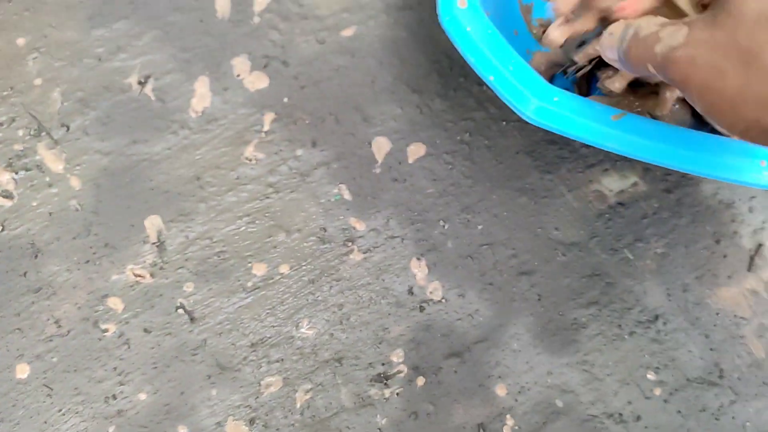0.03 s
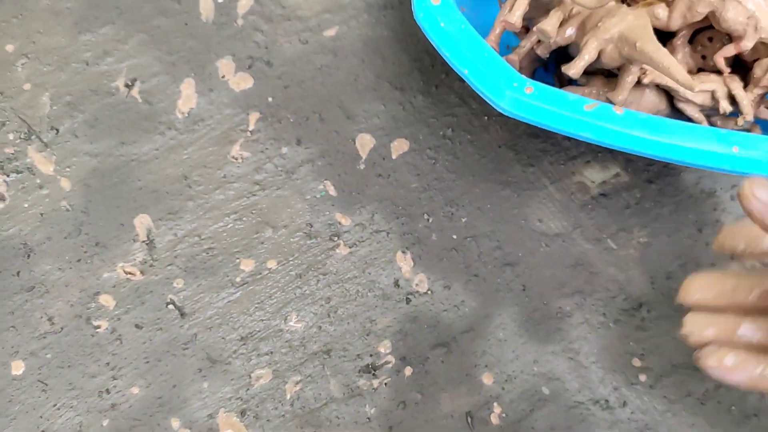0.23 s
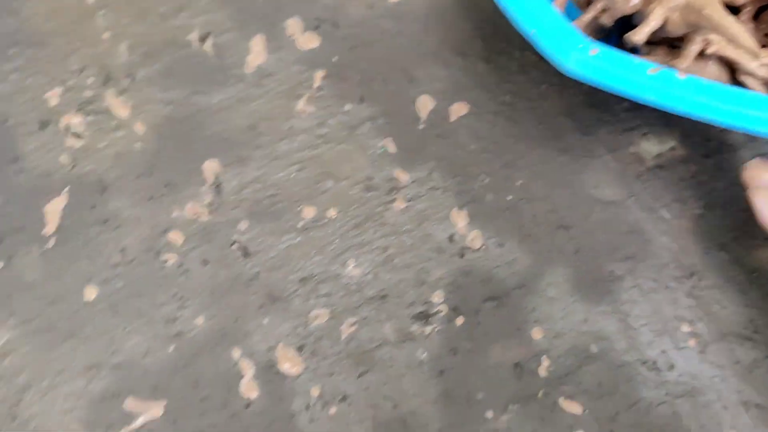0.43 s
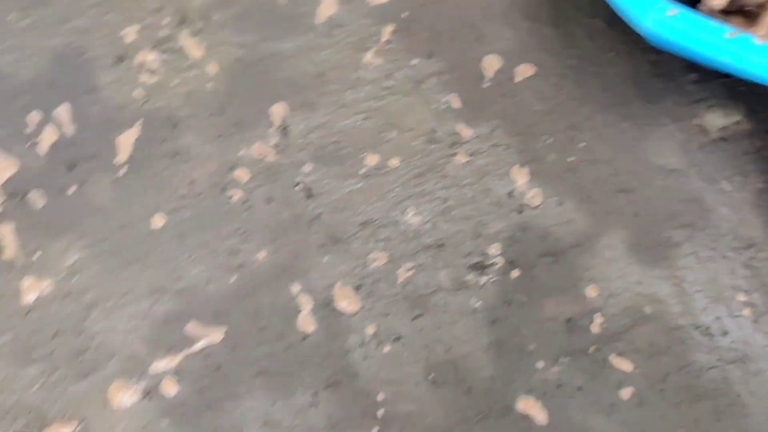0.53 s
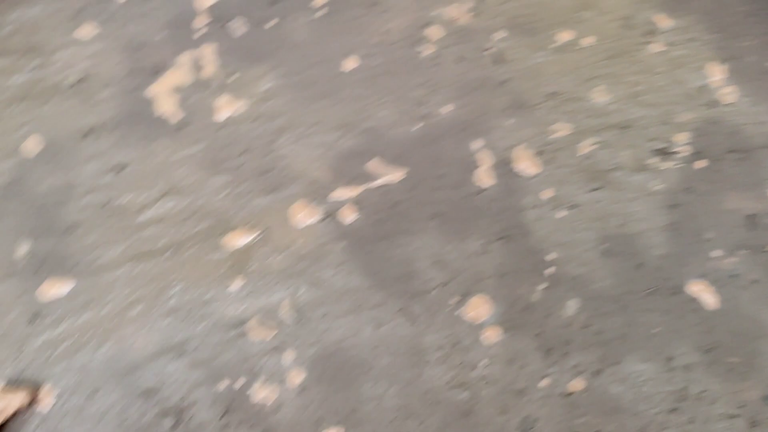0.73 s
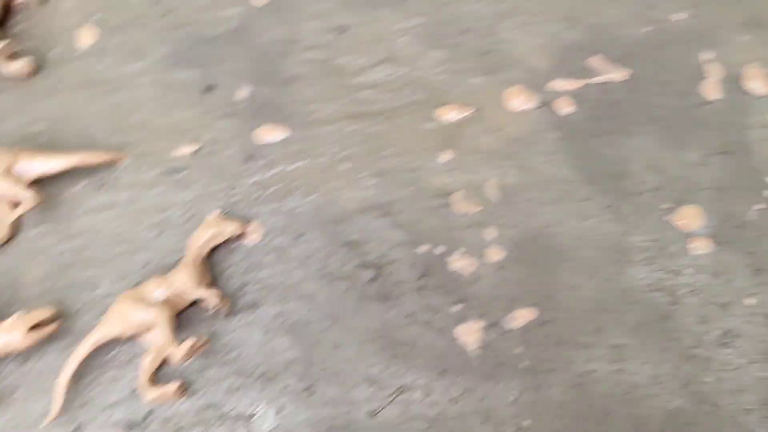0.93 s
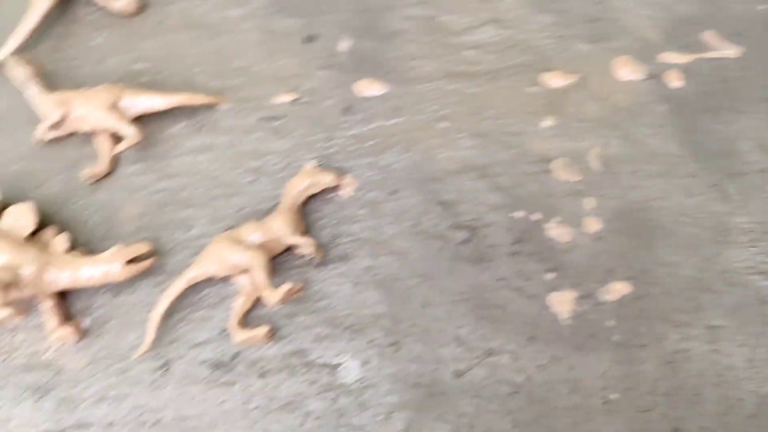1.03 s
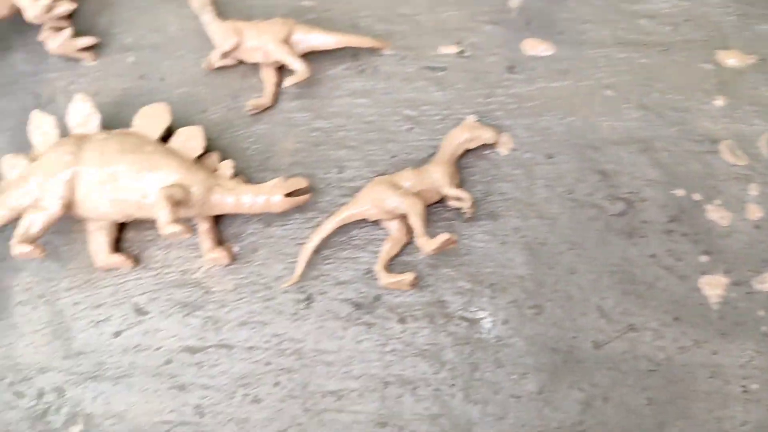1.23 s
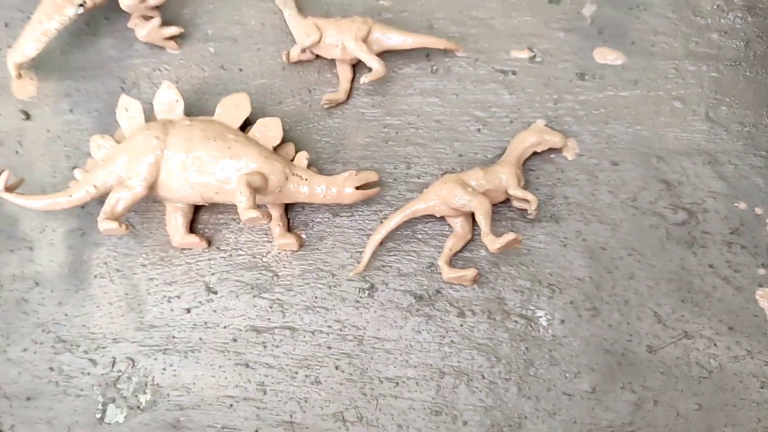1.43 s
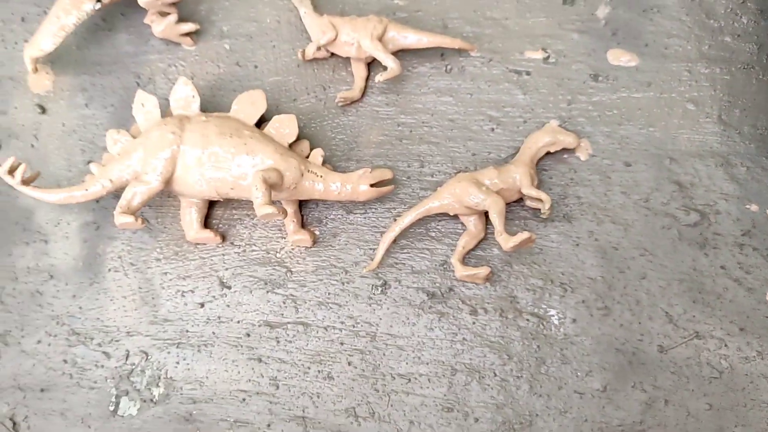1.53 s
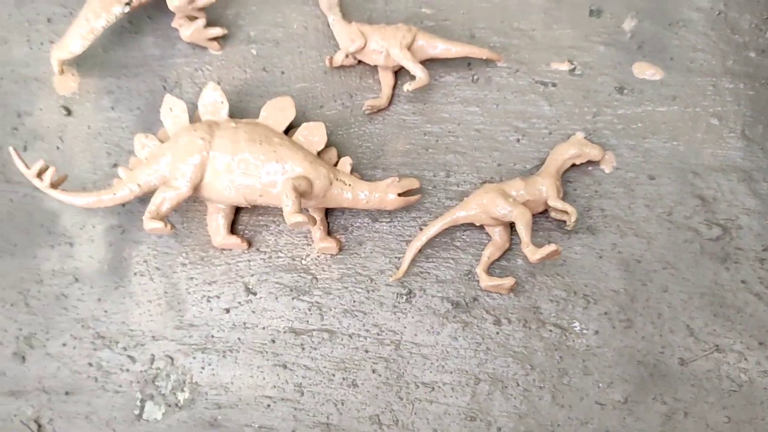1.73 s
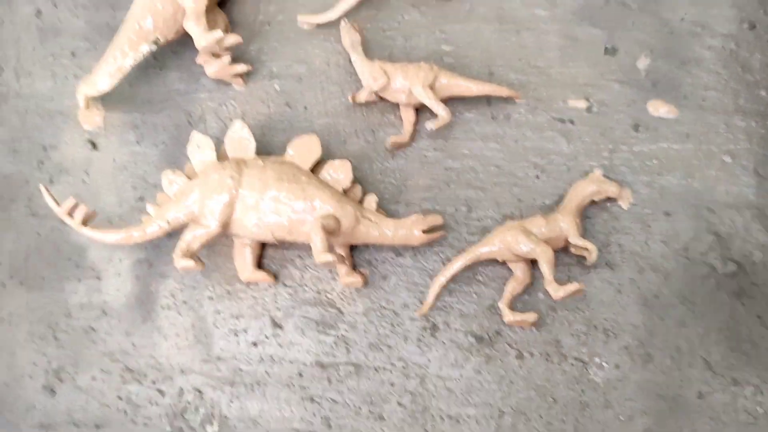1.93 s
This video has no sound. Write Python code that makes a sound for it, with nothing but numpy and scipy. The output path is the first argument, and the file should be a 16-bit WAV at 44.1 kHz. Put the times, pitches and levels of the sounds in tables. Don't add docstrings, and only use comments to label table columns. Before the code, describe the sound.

Hollow plastic toys clatter sharply in a plastic tub, close to the microphone, then sandals scrape over gritty concrete and a heel thuds; a distant engine hums low outdoors, with faint, very high bird twitter.

```python
import sys
import numpy as np
from scipy import signal
from scipy.fft import rfft, irfft, next_fast_len
from scipy.io import wavfile
from scipy.ndimage import uniform_filter1d, map_coordinates

SR = 44100
rng = np.random.default_rng(int(sys.argv[2]) if len(sys.argv) > 2 else 0)


def pcm_store(signal):
    levels = np.round(np.clip(np.atleast_2d(signal), -1, 1) * 32767)
    wavfile.write(sys.argv[1], SR, levels.astype(np.int16).T)


def gain_from_decibels(decibels):
    exponent = np.asarray(decibels, float) / 20
    return 10 ** exponent


N = 88200

# [t/s, lower tone level/dB, upper tone level/dB]
ENGINE_TONES = [(0, -44.5, -49), (.6, -44.5, -48), (.85, -52, -43), (1.05, -44.5, -49.5), (1.25, -43, -43),
                (2, -42.5, -42)]
# [multiple of the firing rate, level/dB]
FIRING_TONES = [(5, -52), (8, -53), (9, -51)]
# [f/Hz, level per Hz/dB]
RUMBLE_COLOUR = [(15, -81), (25, -29), (54, -21), (82, -8), (114, -7), (192, -8.5), (284, -8.5), (330, -13),
                 (460, -17.5), (900, -41), (1170, -94), (1980, -120)]
FIRING_HZ, LOWER_HZ, UPPER_HZ, RUMBLE_DB = 28.01, 111.8, 279.6, -45

# [f/Hz, level per Hz/dB]
AIR_COLOUR = [(290, -9.5), (500, -12), (900, -18), (2200, -25.5), (3500, -27), (7300, -33.5), (8600, -26.5),
              (11000, -30), (15900, -35.5)]
AIR_DB = -55.5
# [f/Hz, likeness 0..1]
ALIKE = [(60, 1), (250, 0.64), (700, 0.28), (2000, 0.16), (8000, 0.054)]

# [t/s, f/Hz, level/dB]
TWITTER = [
    [(.025, 11500, -61), (.035, 11800, -66), (.055, 11400, -67.5), (.068, 11500, -71), (.088, 11000, -65)],
    [(.092, 12000, -74), (.1, 11900, -64), (.11, 11300, -67), (.15, 10600, -85)],
    [(.415, 11000, -93), (.435, 10200, -73), (.445, 10150, -81), (.47, 10350, -76), (.49, 10900, -71),
     (.515, 11250, -73)],
    [(.518, 11400, -76), (.535, 11500, -74), (.555, 11000, -80)],
    [(1.89, 11000, -82), (1.93, 12400, -72)],
    [(1.935, 12700, -80), (1.99, 13700, -79)],
]
# [t/s, level/dB]
FLOCK = [
    (1.66, -68),
    (1.72, -61),
    (1.8, -56),
    (1.87, -68),
    (1.93, -63),
    (2, -57),
]
FLOCK_HZ = (10500, 11200, 11900, 13100, 14000)

# [t/s, level/dB]
RATTLE = [(.095, -38), (.1, -38), (.122, -32.5), (.16, -37), (.186, -52), (.195, -31), (.214, -33.5),
          (.222, -27), (.24, -29), (.27, -32), (.295, -38.5), (.31, -46.5), (.33, -38.5), (.35, -50),
          (.38, -67)]
# [t/s, peak level/dB, pitch factor, crack level/dB, left-right/dB]
CLACKS = [
    (.098, -27.5, 1.04, -8, -0.5),
    (.117, -18.5, 0.68, -19, -2),
    (.124, -25.5, 0.89, -9, 4.5),
    (.146, -22.5, 0.6, -25, -1),
    (.229, -19, 1.28, -25, 6),
    (.237, -30, 1.05, -31, 9),
    (.2555, -23, 1.1, -16, 5),
    (.2745, -18.5, 0.496, -1.5, 1),
    (.317, -22.5, 0.55, -30, -2),
    (.327, -27.5, 1.14, -19, 2),
]
# [f/Hz, level/dB, time to fall 60 dB/s]
TOY = [(243, -11, 0.1), (370, -10, 0.046), (490, -14, 0.03), (718, -1.5, 0.04), (987, -2.5, 0.015),
       (1178, -3, 0.021), (1437, -10.5, 0.027), (2070, -13.5, 0.014), (5080, -15, 0.0037)]
# [t/s, peak level/dB, pitch factor, crack level/dB, left-right/dB]
SNAP = [
    (.1905, -11.5, 1.0, -7, 1.5),
]
# [f/Hz, level/dB, time to fall 60 dB/s]
SMALL_TOY = [(650, -3, 0.02), (990, -1, 0.018), (1423, 1, 0.015), (1810, -3, 0.012), (2570, -11, 0.01),
             (3400, -13, 0.007), (4330, -9, 0.007)]
# [t/s, peak level/dB, pitch factor, crack level/dB, left-right/dB]
DROP = [
    (.2181, -6.5, 0.99, -10.5, 2),
]
# [f/Hz, level/dB, time to fall 60 dB/s]
BIG_TOY = [(250, -13, 0.073), (366, -12, 0.052), (742, -2.5, 0.041), (984, -3, 0.017), (1053, -7, 0.027),
           (1226, -2.5, .025), (1401, -4.5, 0.022), (1780, -9.5, 0.017), (3610, -7, 0.01),
           (4970, -8.5, 0.0093)]

# [t/s, peak level/dB, pitch factor, crack level/dB, left-right/dB]
TICKS = [
    (1.2925, -46, 0.88, 12.5, 0.5),
    (1.474, -38, 1.1, 1, 1),
    (.684, -57, 0.64, -7, 0),
    (.738, -61, 0.77, 13, -1),
    (1.0603, -55, 0.71, 16, -5),
    (1.0698, -46.5, 0.91, 16, -3),
    (1.5078, -61, 0.88, 9, 1.5),
]
# [f/Hz, level/dB, time to fall 60 dB/s]
PEBBLE = [(1480, 0, 0.01), (3520, -8, 0.0055)]
# [t/s, level/dB, body level/dB]
SHUFFLE = [(.72, -67.5, 5), (.76, -59.5, -19), (.85, -53.5, -7), (.89, -48, -7.5), (.98, -45.5, -6.5),
           (1.02, -50.5, -8.5), (1.07, -43, -9.5), (1.14, -47.5, 0), (1.19, -55.5, -5.5), (1.23, -69, -24),
           (1.36, -58.5, -19), (1.468, -65.5, 2), (1.478, -53, 0.5), (1.535, -40, -3.5), (1.63, -39, 0),
           (1.68, -56.5, 3), (1.76, -54.5, 3.5), (1.85, -64, -17), (2, -63, -5)]
# [f/Hz, level per Hz/dB]
GRIT_COLOUR = [(1180, 0), (2000, -6), (3420, 1.5), (3900, 2.5), (4520, 2), (7090, -5.5), (8740, 3.5),
               (11400, 5), (13200, -3), (15900, -9.5)]
# [f/Hz, width/Hz, level/dB]
SOLE = [(630, 180, -16), (1228, 140, 0.5), (1500, 37, 2.5), (1470, 3070, -3)]
GRIT_DB, SOLE_DB, GRITTY_DB = 0.32, 3, 2
# [t/s, level/dB, f/Hz]
SQUEAK = [
    (.83, -65, 587),
    (.87, -55, 598),
    (.92, -46, 587),
    (.96, -68, 585),
]

# [t/s, peak level/dB, pitch factor, crack level/dB, left-right/dB]
THUDS = [
    (1.6206, -10, 1.007, -19, 4.5),
    (1.6285, -21.5, 1.77, -14, 3),
    (1.655, -25.5, 1.26, -30, 0),
    (1.682, -26.5, 0.93, -12, 0),
    (1.756, -32, 1.3, -7, 4),
    (1.821, -32.5, 1.0, -30, -2),
]
# [f/Hz, level/dB, time to fall 60 dB/s]
HEEL = [(215, -1, .06), (300, -18, .03), (395, 0, .055), (560, -16, .04), (738, -11, .05), (950, -19, .05)]
# [t/s, level/dB]
SCUFFLE = [(1.63, -46), (1.645, -35.5), (1.67, -45), (1.688, -37.5), (1.72, -51), (1.748, -53),
           (1.758, -38), (1.775, -44), (1.785, -53), (1.8, -48.5), (1.84, -86)]
# [f/Hz, time to fall 60 dB/s]
YARD = [(300, 0.28), (2000, 0.28), (12000, 0.21)]
YARD_DB = -14
# [f/Hz, left-right/dB]
LEAN = [(300, 0.3), (1200, 0), (4000, 0.6), (8000, -6.7), (13000, 8.5)]


def unit(x):
    return x / np.sqrt(np.mean(x ** 2) + 1e-20)


def along(points, hz):
    f, v = np.transpose(points)
    return np.interp(np.log(hz + 1), np.log(f + 1), v)


def curves(rows):
    s, *cols = np.transpose(rows)
    t = np.arange(N) / SR
    gate = np.clip(np.minimum(t - s[0], s[-1] + .01 - t) / .01, 0, 1)
    return [np.interp(t, s, c) for c in cols] + [gate]


def wobble(rate):
    return map_coordinates(rng.standard_normal(int(N * rate / SR) + 4), [np.arange(N) * rate / SR])


def whistle(hz):
    return np.sin(2 * np.pi * np.cumsum(hz) / SR)


def filtered(x, response):
    m = next_fast_len(N + SR // 2)
    return irfft(rfft(x, m) * response(np.fft.rfftfreq(m, 1 / SR)), m)[..., :N]


def panned(x, db):
    return x * gain_from_decibels([[db / 2], [-db / 2]])


def lagged(x, lag_s):
    return filtered(x, lambda hz: np.exp(-1j * np.pi * hz * lag_s * np.array([[1], [-1]])))


def rush(gain, patchy_db=3.5):
    z = signal.stft(rng.standard_normal((2, N)), nperseg=512)[2]
    field = uniform_filter1d(rng.standard_normal(z.shape[1:]), size=3, axis=0)
    field = uniform_filter1d(field, size=9, axis=1)
    pair = signal.istft(z * gain_from_decibels(patchy_db * unit(field)), nperseg=512)[1][:, :N]

    def mid_side(hz):
        angle = np.arccos(np.clip(along(ALIKE, hz), -1, 1)) / 2
        return gain(hz) * np.array([np.cos(angle), np.sin(angle)])

    mid, side = filtered(pair, mid_side)
    return unit(np.array([mid + side, mid - side]))


def struck(hits, modes, attack_s, crack_s, scatter_db, crack_hz):
    out, t = np.zeros((2, N + SR)), np.arange(SR // 5) / SR
    f, level, t60 = np.transpose(modes)[..., None]
    soft = np.exp(-2 * np.pi * crack_hz / SR)
    for s, db, pitch, crack_db, pan in hits:
        level_draw, pitch_draw, *side_draws = rng.standard_normal((4, len(modes), 1))
        hz = f * pitch * (1 + scatter_db / 200 * pitch_draw)
        fall_db = 60 * t / t60 * max(pitch, 1) ** 1.5
        ring = []
        for side in side_draws:
            mode_db = level + scatter_db * (level_draw + 1.54 * side) - fall_db
            phase = 0.43 * side * np.minimum(f / 700, 2)
            ring.append(np.sum(gain_from_decibels(mode_db) * np.sin(2 * np.pi * hz * t + phase), 0))
        ring = np.array(ring) * (1 - np.exp(-t / attack_s))
        noise = signal.lfilter([(1 - soft) ** 2], [1, -2 * soft, soft ** 2], rng.standard_normal((2, len(t))))
        crack = gain_from_decibels(crack_db + 3.5 - 60 * t / crack_s) * np.minimum(t / 0.0022, 1) * noise
        hit = gain_from_decibels(db) * panned(ring / np.abs(ring).max() + crack, pan)
        out[:, round(s * SR):][:, :len(t)] += hit
    return out[:, :N]


def grains(rows, hz, spread, life, count):
    u, g, k = rng.random(count), rng.standard_normal((count, 2)), np.arange(2400)
    start = ((rows[0][0] + u * (rows[-1][0] - rows[0][0])) * SR).astype(int)
    cycles = hz * np.exp(spread * np.clip(g[:, :1], -2, 1.6)) * k / SR
    tones = np.sin(2 * np.pi * cycles) * np.exp(-cycles / life) * np.minimum(cycles, 1)
    at = (start[:, None] + k).ravel()
    pair = []
    for side in (1, -1):
        placed = tones * gain_from_decibels(side * 4.3 * g[:, 1:])
        pair.append(np.bincount(at, placed.ravel(), N)[:N])
    pair = np.array(pair)
    power = uniform_filter1d(pair ** 2, size=1500).mean(0)
    return pair / np.sqrt(np.abs(power) + 1e-3)


def engine():
    lower_db, upper_db, _ = curves(ENGINE_TONES)
    t = np.arange(N) / SR
    firing = 2 * np.pi * np.cumsum(FIRING_HZ * (1 + 0.011 * wobble(5.01))) / SR

    def tone(phase, db, loose):
        drift = loose * wobble(15) + np.array([[.1], [-.1]]) * wobble(5.87)
        return np.sqrt(2) * gain_from_decibels(db + 4.8 * loose * wobble(13.95)) * np.sin(phase + drift)

    weak = gain_from_decibels(-2.5) * sum(tone(k * firing, db, 0.92) for k, db in FIRING_TONES)
    lower = tone(2 * np.pi * LOWER_HZ * t, lower_db, 0.36)
    upper = panned(tone(2 * np.pi * UPPER_HZ * t, upper_db, 0.27), 0.5)
    swell = unit(gain_from_decibels(3.0 * wobble(8.88)))
    rumble = swell * rush(lambda hz: gain_from_decibels(along(RUMBLE_COLOUR, hz)), patchy_db=1.0)
    return weak + lower + upper + gain_from_decibels(RUMBLE_DB) * rumble


def outdoor_air():
    return gain_from_decibels(AIR_DB + 0.5 * wobble(7.9)) * rush(lambda hz: gain_from_decibels(along(AIR_COLOUR, hz)))


def bird():
    out = 0
    for call in TWITTER:
        hz, db, gate = curves(call)
        loudness = np.sqrt(2) * gate * gain_from_decibels(db - 0.5 + 4.0 * wobble(120))
        out = out + loudness * whistle(hz + 60 * wobble(150))
    db, gate = curves(FLOCK)
    for hz in FLOCK_HZ:
        loudness = gate * gain_from_decibels(db - 17 + 7.0 * wobble(60) + 4.0 * wobble(500))
        out = out + loudness * whistle(hz + 180 * wobble(22) + 200 * wobble(600))
    return panned(out, 17.0)


def rattle():
    level_db, gate = curves(RATTLE)
    contacts = grains(RATTLE, 960, 0.533, 0.99, count=900)
    tub = gain_from_decibels(-2.5) * grains(RATTLE, 257.6, 0.337, 3.5, count=150)

    def dust_colour(hz):
        return gain_from_decibels(along(GRIT_COLOUR, hz)) * (hz > 1000) * (3000 / (hz + 3000)) ** 2

    dust = gain_from_decibels(-12.5 + 2.8 * wobble(89)) * rush(dust_colour)
    fizz = rush(lambda hz: np.exp(-(np.log((hz + 1) / 11000) / 0.15) ** 2))
    fizz = gain_from_decibels(-65 + 0.096 * (level_db + 41)) * fizz
    return gate * (gain_from_decibels(level_db - 2.5) * (contacts + tub + dust) + panned(fizz, 15))


def toys():
    clacks = struck(CLACKS, TOY, 0.00067, 0.014, 2.95, crack_hz=8100)
    snap = struck(SNAP, SMALL_TOY, 0.0003, 0.01, 0.56, crack_hz=7440)
    drop = struck(DROP, BIG_TOY, 0.00063, 0.015, 0.64, crack_hz=6960)
    return rattle() + clacks + snap + drop


def grit_ticks():
    return struck(TICKS, PEBBLE, 0.00058, 0.013, 2.1, crack_hz=13000)


def shuffle():
    level_db, body_db, gate = curves(SHUFFLE)

    def grit_colour(hz):
        return gain_from_decibels(along(GRIT_COLOUR, hz)) * hz ** 2 / (hz ** 2 + 1500 ** 2)

    def sole_colour(f):
        return sum(gain_from_decibels(db) * np.abs(f * w / (c * c - f * f + 1j * f * w)) ** 2 for c, w, db in SOLE)

    grit = gain_from_decibels(GRIT_DB + GRITTY_DB * wobble(300) + 1.5 * wobble(35.3)) * rush(grit_colour)
    body = gain_from_decibels(SOLE_DB + body_db + GRITTY_DB * wobble(70)) * rush(sole_colour)
    return panned(gain_from_decibels(level_db) * gate * (grit + body), -1)


def strap_squeak():
    db, hz, gate = curves(SQUEAK)
    return gate * gain_from_decibels(db + 3.0 * wobble(40)) * whistle(hz + 15 * wobble(50))


def heel_thud():
    return struck(THUDS, HEEL, 0.004, 0.024, 1.0, crack_hz=1700)


def scuffle():
    level_db, gate = curves(SCUFFLE)
    scrapes = grains(SCUFFLE, 898, 0.351, 2.3, count=300)
    return panned(gate * gain_from_decibels(level_db) * scrapes, 6.2)


def yard(x):
    hz, t, z = signal.stft(rng.standard_normal((2, SR // 2)), SR, nperseg=256)
    tail = signal.istft(z * gain_from_decibels(-60 * t / along(YARD, hz)[:, None]), SR, nperseg=256)[1]
    later = np.pad(x, ((0, 0), (150, 0)))
    return signal.fftconvolve(later, tail / np.linalg.norm(tail[0]), axes=1)[:, :N]


def scene():
    far = engine() + outdoor_air() + bird()
    tub = lagged(toys(), 0.000093)
    feet = lagged(strap_squeak() + heel_thud() + scuffle(), -0.00043)
    near = tub + grit_ticks() + feet
    return far + near + lagged(shuffle(), 0.000176) + gain_from_decibels(YARD_DB) * yard(near)


def roll_off(x):
    return signal.sosfilt(signal.butter(12, 15800, fs=SR, output="sos"), x)


def record(dry):
    def response(hz):
        low_cut = (1j * hz / (1j * hz + 66)) ** 2
        ports = gain_from_decibels(along(LEAN, hz) * np.array([[.5], [-.5]]))
        return low_cut * (hz < 15800) * ports

    mix = filtered(dry, response)
    return roll_off(mix)


dry = scene()
out = record(dry)
pcm_store(out)
```